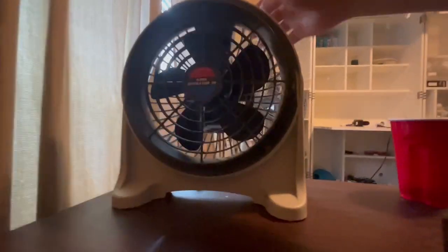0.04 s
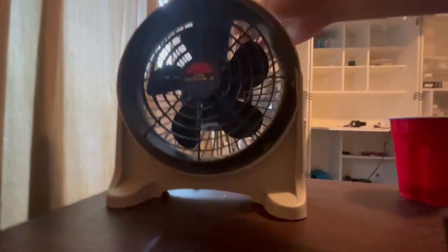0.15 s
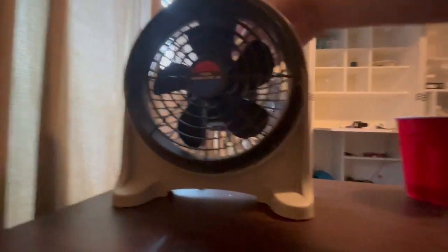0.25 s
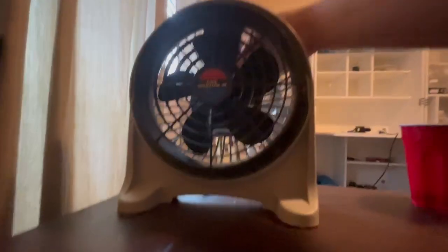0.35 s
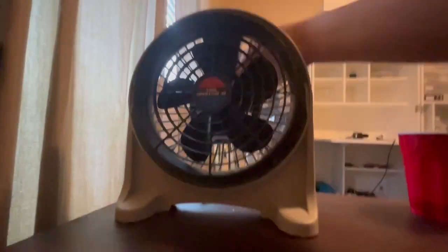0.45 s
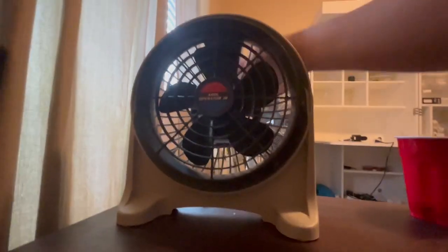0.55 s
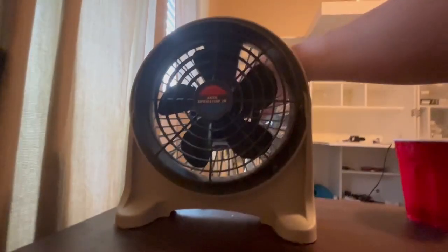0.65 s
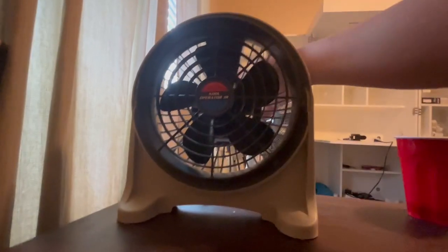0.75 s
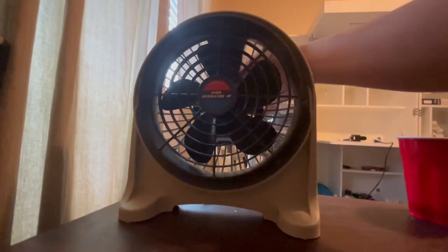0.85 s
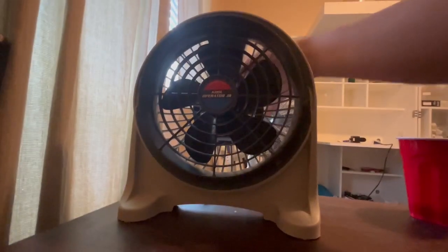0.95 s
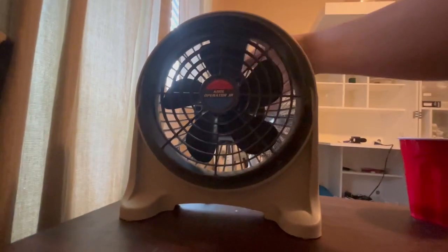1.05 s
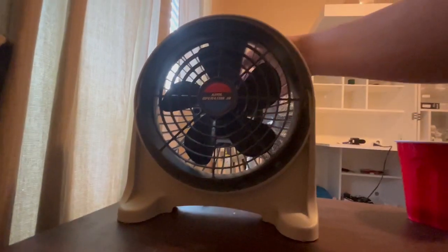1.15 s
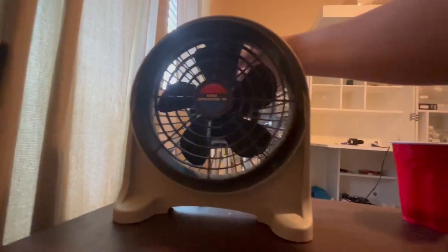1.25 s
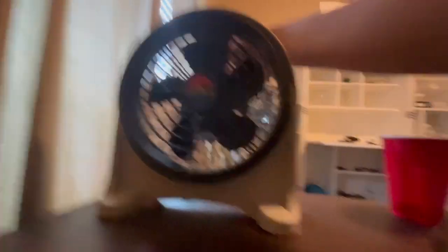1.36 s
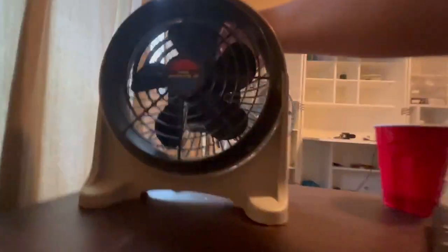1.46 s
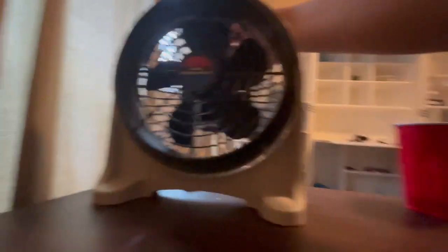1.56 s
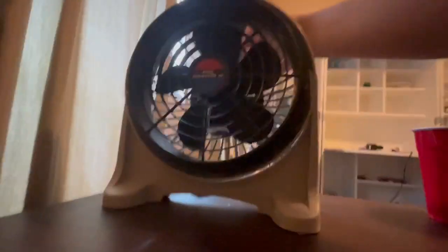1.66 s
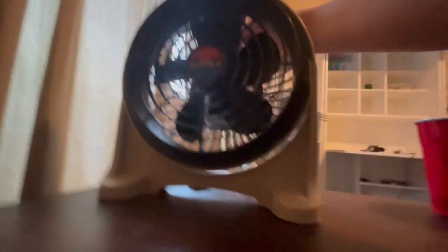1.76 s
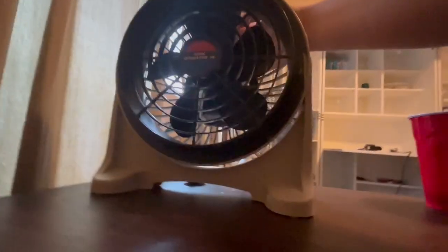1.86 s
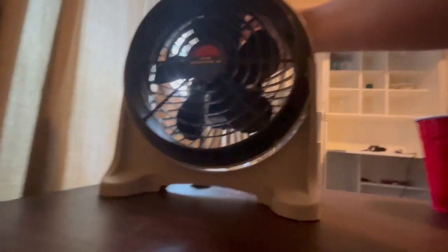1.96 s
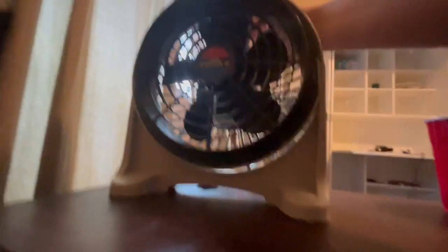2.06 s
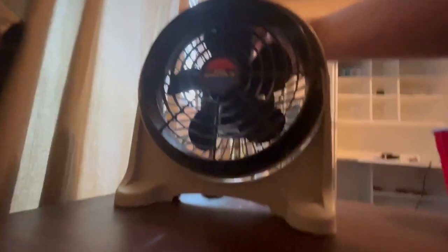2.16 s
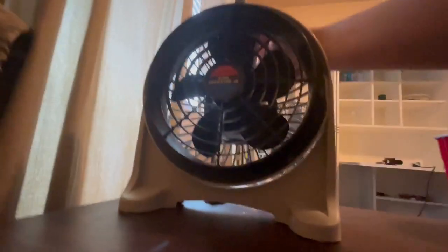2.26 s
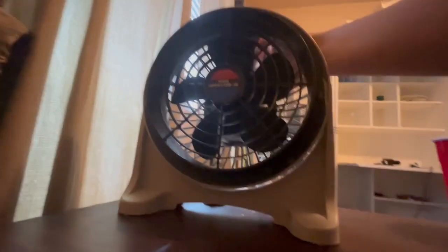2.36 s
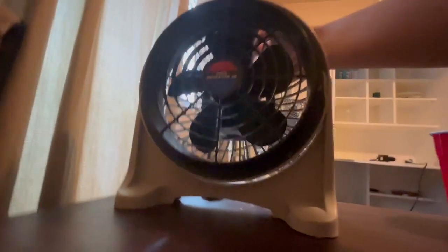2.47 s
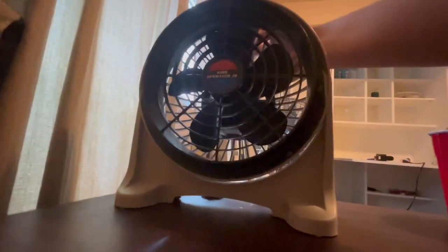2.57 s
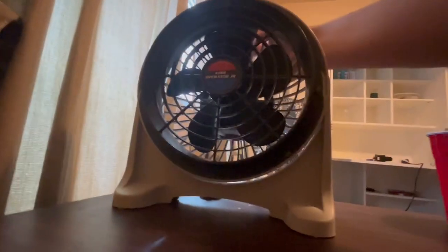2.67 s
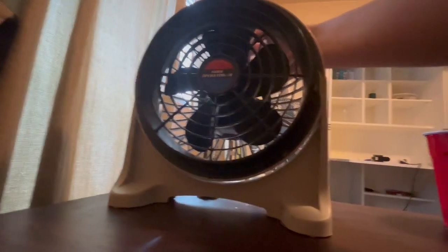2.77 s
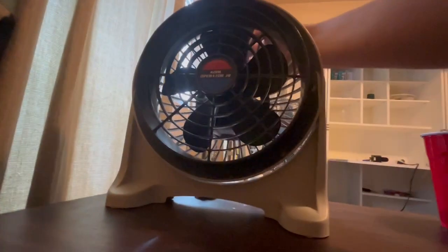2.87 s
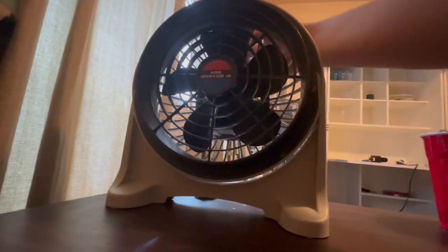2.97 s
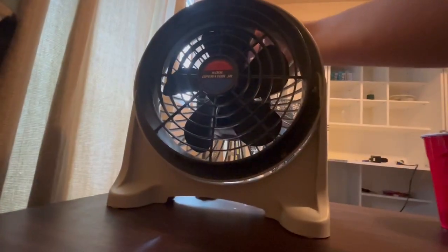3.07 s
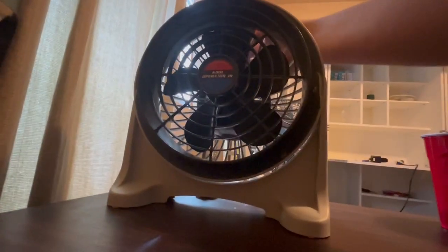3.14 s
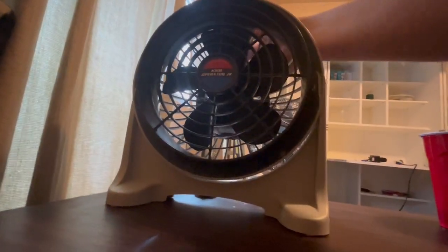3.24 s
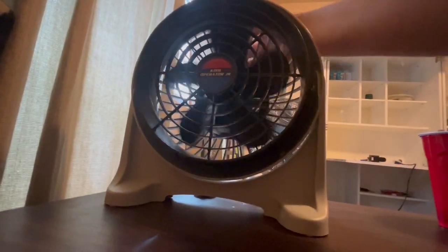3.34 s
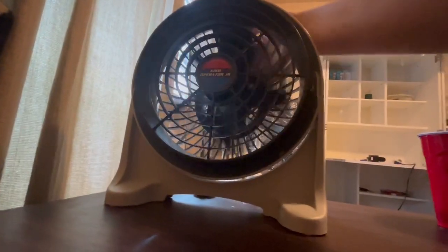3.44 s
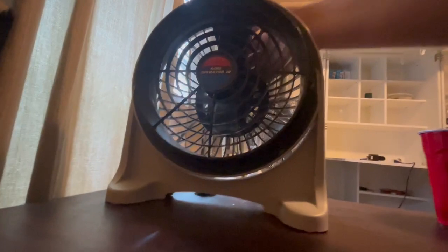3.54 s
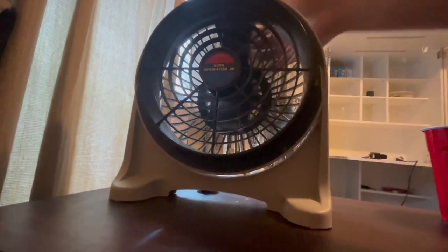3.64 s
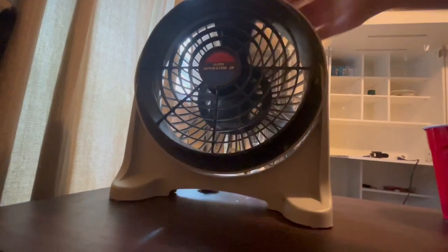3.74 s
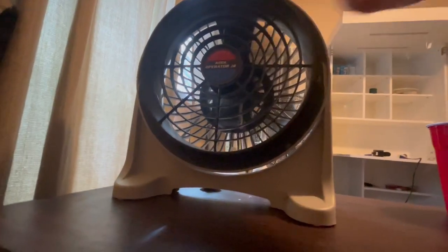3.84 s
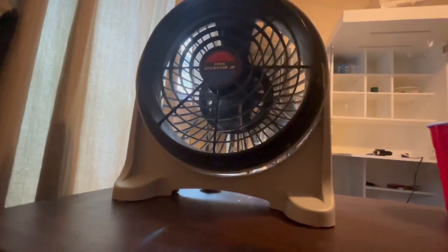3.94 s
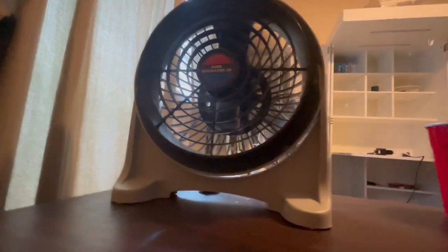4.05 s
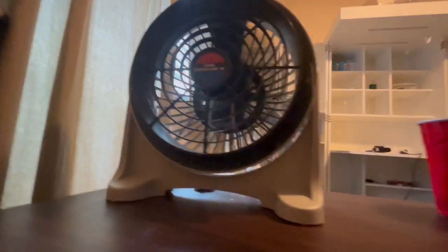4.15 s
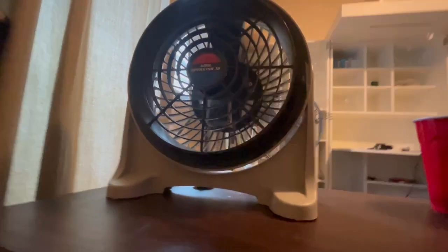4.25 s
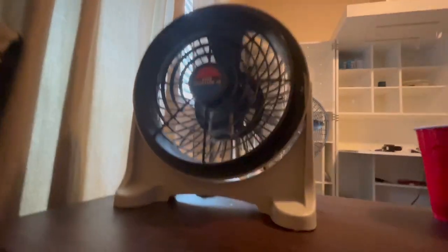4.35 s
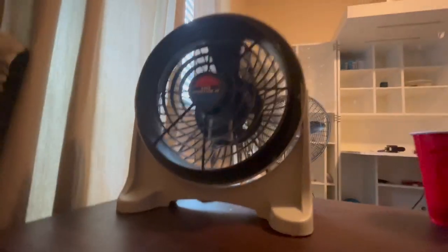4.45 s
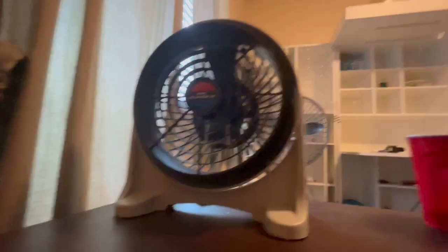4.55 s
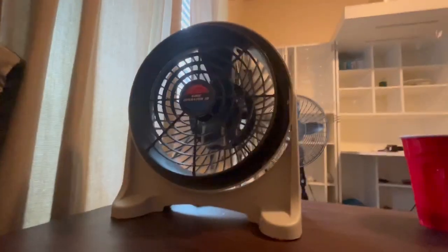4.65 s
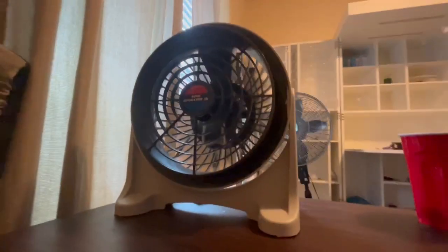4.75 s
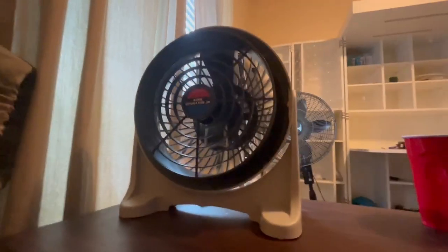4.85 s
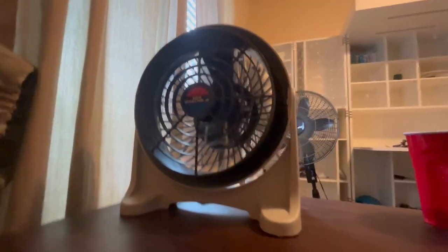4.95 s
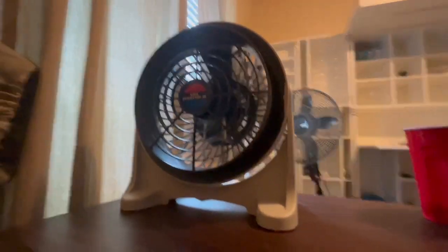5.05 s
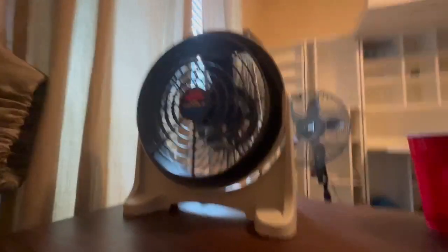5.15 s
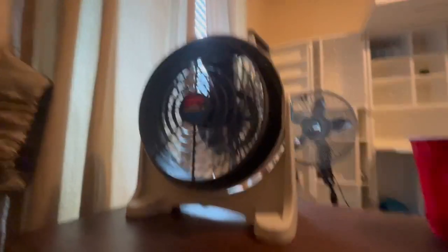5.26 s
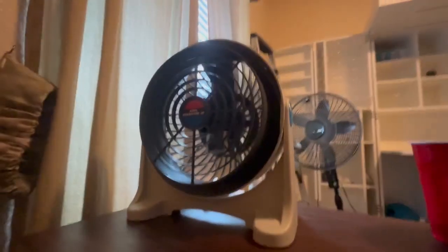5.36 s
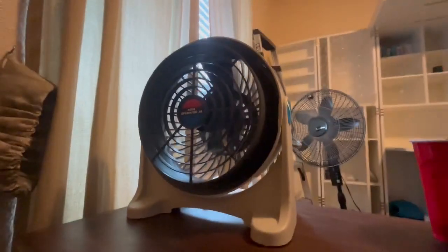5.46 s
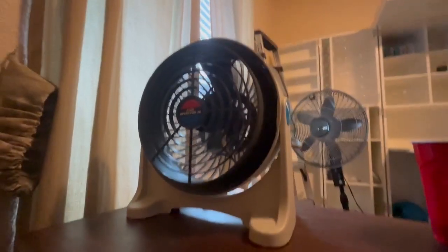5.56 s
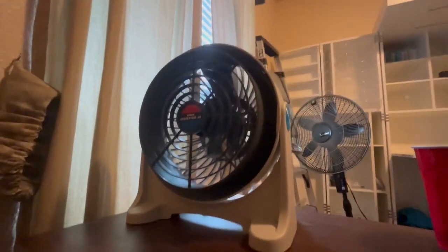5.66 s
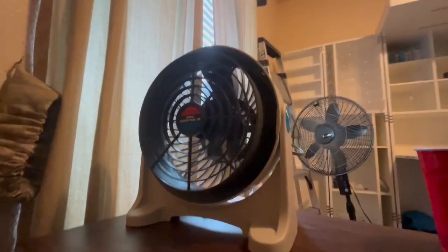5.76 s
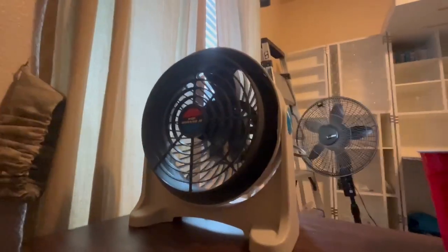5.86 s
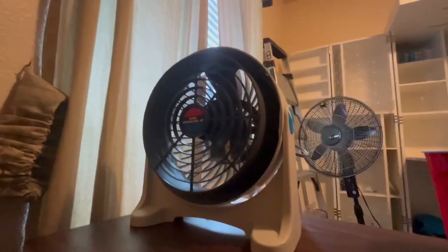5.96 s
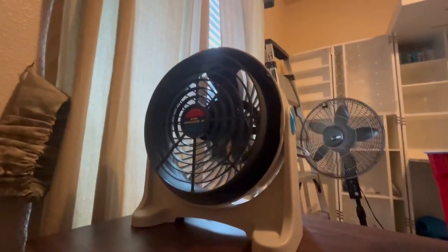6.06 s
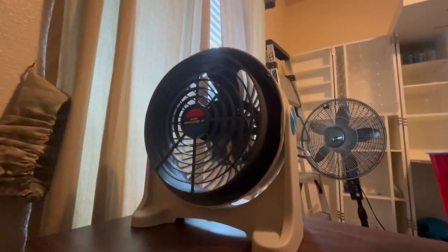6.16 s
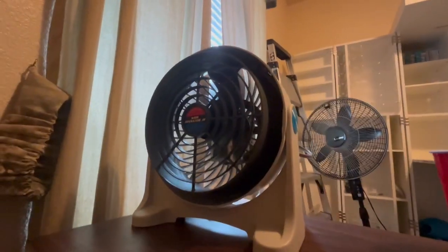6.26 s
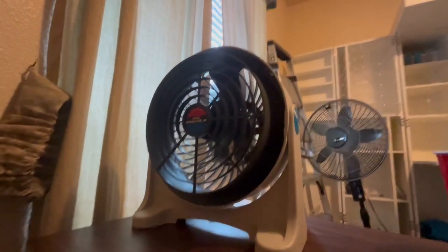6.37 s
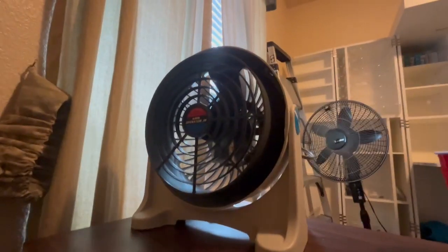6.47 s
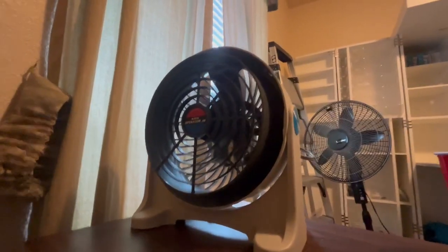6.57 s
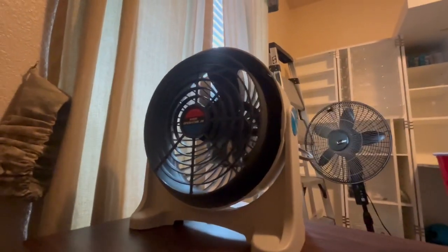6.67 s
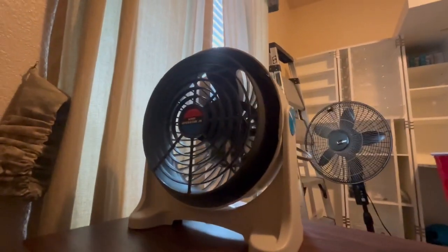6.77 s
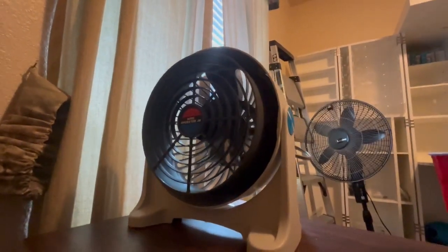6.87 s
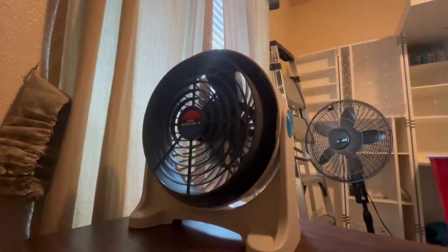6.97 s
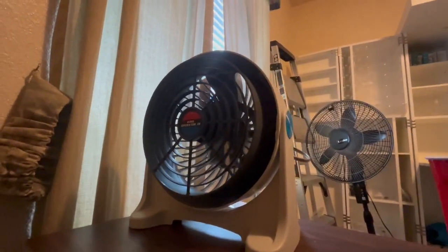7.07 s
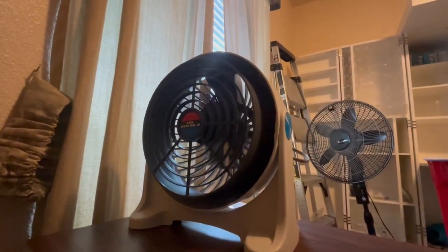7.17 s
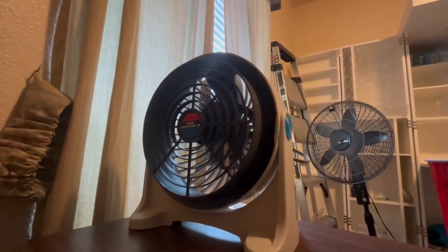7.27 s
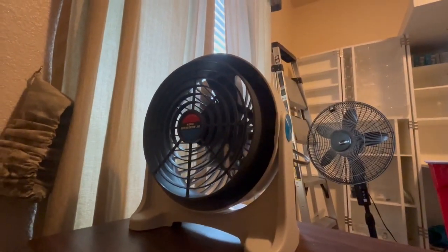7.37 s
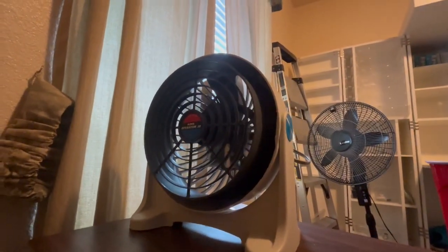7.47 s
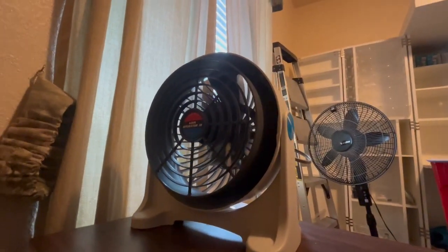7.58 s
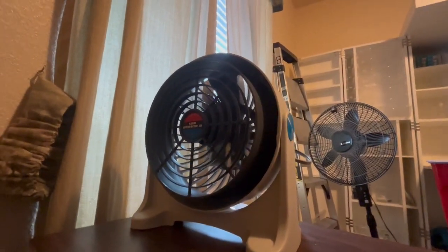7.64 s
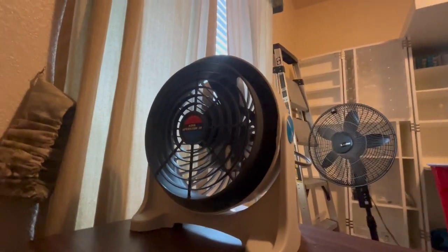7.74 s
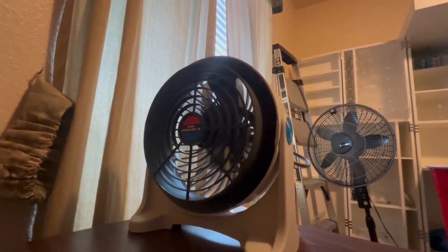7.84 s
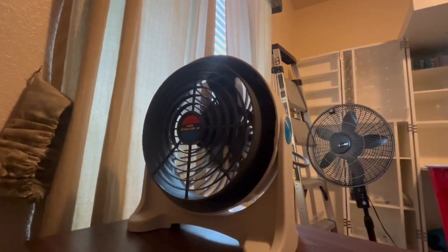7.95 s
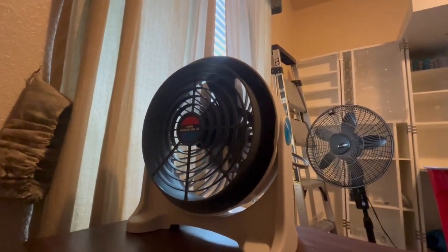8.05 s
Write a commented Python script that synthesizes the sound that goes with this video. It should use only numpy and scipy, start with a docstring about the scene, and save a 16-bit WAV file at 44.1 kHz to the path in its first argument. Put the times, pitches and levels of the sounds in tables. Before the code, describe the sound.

A hand clicks and knocks on a small plastic fan, then it starts up with a steady hum and rush of air.

```python
"""Small desk fan switched on, close up

In a furnished room a hand grips and shifts a plastic fan: skin rubs, the case rattles, the switch
clicks. The motor kicks on with a thump, buzzes, then whines and hums as the rotor spins up. Air rushes
off the blades, hisses through the grille and buffets two hand-held microphones."""
import sys
import numpy as np
from scipy import signal
from scipy.fft import rfft, irfft, next_fast_len
from scipy.io import wavfile
from scipy.ndimage import uniform_filter1d, map_coordinates

SR = 44100
rng = np.random.default_rng(int(sys.argv[2]) if len(sys.argv) > 2 else 0)


def put_to_file(sound):
    """Save the sound as 16-bit audio at rate SR, in the file named by the first command-line argument."""
    columns = np.atleast_2d(sound).T  # one column per channel
    safe = np.clip(columns, -1, 1)
    whole_steps = np.round(safe * 32767)
    wavfile.write(sys.argv[1], SR, whole_steps.astype(np.int16))


N = 357651
TIME = np.arange(N) / SR
TOP_HZ, POWER_ON_S = 14400, 3.285


def amp(db):
    return 10 ** (np.asarray(db) / 20)


def along(points, hz):
    """Table columns interpolated over log frequency."""
    f, *cols = np.transpose(points)
    return np.squeeze([np.interp(np.log(hz + 1), np.log(f + 1), c) for c in cols])


def curve(points):
    return np.interp(TIME, *np.transpose(points))


def gate(start_s, fade_s):
    return np.clip((TIME - start_s) / fade_s, 0, 1)


def wobble(rate_hz):
    """Smooth random curve."""
    return map_coordinates(rng.standard_normal(int(N * rate_hz / SR) + 4), [TIME * rate_hz])


def filtered(x, response):
    n = x.shape[-1]
    m = next_fast_len(n + 8192)
    return irfft(rfft(x, m) * response(np.fft.rfftfreq(m, 1 / SR)), m)[..., :n]


def panned(db):
    """Left and right gains, mean 1."""
    left = 2 / (1 + amp(-db))
    return np.array([[left], [2 - left]])


# Stereo image, wide in the middle, mono in the top treble:
# (frequency [Hz], coherence [0-1], left lead [rad], left over right [dB])
STEREO_IMAGE = [(60.4, 0.55, 0.8, 2.5), (139, 0.77, 0.4, 5), (460, 0.84, 1, 8), (840, 0.39, 0.5, 7),
                (1170, 0.88, 1, 1.5), (1700, 0.39, 3.5, 4.5), (1993, 0.72, 4, 0.5), (2545, 0.45, 8, 2.5),
                (3820, 0.26, 9, 5), (5100, 0, 5, 8.5), (6850, 0.43, 5, 7.5), (7350, 0.1, 5, 1),
                (8620, 0.7, 0.8, 4), (9950, 0.57, 1.5, -1.5), (11600, 1, -2.5, -1), (14700, 1, -1, 0.5)]
def noise(spectrum, patchy_db):
    """Patchy coloured stereo noise; the channel mean has rms 1."""
    cells = signal.stft(rng.standard_normal((3, N)), nperseg=512)[2]
    patches = uniform_filter1d(rng.standard_normal(cells.shape[1:]), size=6, axis=0)
    patches = uniform_filter1d(patches, size=12, axis=1)
    patches /= np.sqrt(np.mean(patches ** 2))
    common, *own = signal.istft(cells * amp(patchy_db * patches), nperseg=512)[1][:, :N]

    def heard(hz, shared):
        coherence, lead_rad, pan_db = along(STEREO_IMAGE, hz)
        coherence = np.clip(coherence, 0, 1)
        side = np.array([[.5], [-.5]])
        share = np.sqrt(coherence) * np.exp(1j * side * lead_rad) if shared else np.sqrt(1 - coherence)
        return share * amp(along(spectrum, hz) + side * pan_db)
    pair = filtered(common, lambda hz: heard(hz, True))
    pair += filtered(np.array(own), lambda hz: heard(hz, False))
    return pair / np.std(pair.mean(axis=0))


def knocks(events, modes, snap, blow_t60_s, pan_db, thud_db, room_db, room_t60_s, soft=0):
    """A snap and a burst ring the modes, with crack, desk thud and echo; soft dulls low-treble blows."""
    def body(f, damp=1):
        ring = sum((-1) ** k * amp(db) * 1j * f * width / (hz * hz - f * f + 1j * f * width * damp)
                   for k, (hz, width, db) in enumerate(modes))
        return ring / (1 + 1j * f / 6500) ** 2

    def bright(f):
        return (1j * f / (2500 + 1j * f)) ** 2 / (1 + 1j * f / 6000) ** 3

    def unit_peak(x):
        return x / np.max(np.abs(x))

    out, t = np.zeros((2, N + SR)), np.arange(SR // 4) / SR
    for s, db, treble_db in events:
        white = rng.standard_normal((3, len(t)))
        detune, thud_hz = amp(0.21 * white[2, 0]), 200 * amp(white[1, 0])
        blow = white[0] * amp(-60 * t / blow_t60_s) * (1 - np.exp(-t / 0.00067))
        hit = blow + snap * np.exp(-((t - 0.001) / 0.00005) ** 2)
        echo = white[1:] * amp(room_db - 60 * t / room_t60_s) * (1 - np.exp(-t / 0.00036))
        ring = filtered(hit * panned(pan_db), lambda f: body(f * detune))
        ring += filtered(echo, lambda f: 2 * body(f, damp=1.8) / (1 + 1j * f / 1500))  # walls blur, dull
        cutoff_hz = TOP_HZ * amp(soft * treble_db)
        ring = filtered(ring, lambda f: 1 / (1 + 1j * f / cutoff_hz) ** 2)
        crack = filtered(blow * panned(pan_db + 3) + echo, bright)  # left port faces the treble
        thud = np.sin(2 * np.pi * thud_hz * t) * amp(-60 * t / 0.22)
        thud *= 1 - np.exp(-(t / 0.0091) ** 2)  # desk answers late
        knock = unit_peak(ring) + amp(treble_db) * unit_peak(crack) + amp(thud_db) * unit_peak(thud)
        out[:, round(s * SR):][:, :len(t)] += amp(db) * knock
    return out[:, :N]


# Room noise spectra: (frequency [Hz], relative density [dB])
ROOM_RUMBLE_SPECTRUM = [(15, -39), (25, -3.5), (49, -3), (124, -9), (145, -13.5), (203, -19), (500, -40.5),
                        (650, -51), (1100, -120)]
ROOM_HISS_SPECTRUM = [(180, -29), (300, -2.5), (2830, -10), (4090, -14), (12500, -22.5), (14200, -27)]
def room():
    """Low rumble and faint even hiss."""
    rumble = amp(-64.5 + 3.8 * wobble(24)) * noise(ROOM_RUMBLE_SPECTRUM, patchy_db=2)
    return rumble + amp(-79.5) * noise(ROOM_HISS_SPECTRUM, patchy_db=1)


# Noise swells: (peak time [s], length [s], rub [dB], thump [dB], hiss [dB])
SWELLS = [(0.034, 0.54, -59, -51, -71.5), (0.308, 0.065, -69, -63, -70), (0.51, 0.044, -67, -85, -86),
          (0.658, 0.095, -68, -71, -74.5), (0.847, 0.11, -68.5, -82, -71.5), (1.276, 0.23, -63, -67, -71.5),
          (1.427, 0.46, -69.5, -62, -77), (1.568, 0.27, -60.5, -45.5, -71), (1.892, 0.14, -69, -77, -76),
          (2.18, 0.14, -64, -70, -79), (0.6, 1, -87, -85, -83.5), (2.704, 0.073, -69, -76, -74),
          (3.312, 0.17, -81, -50, -94), (3.375, 0.15, -65.5, -62, -79)]
# Swell spectra: (frequency [Hz], relative density [dB])
RUB_SPECTRUM = [(300, -12.5), (780, -2.5), (1550, -1), (1880, 6), (2200, -9), (3200, -24), (5000, -120)]
THUMP_SPECTRUM = [(25, -22), (50, 3.5), (100, 4), (160, -6.5), (260, -11.5), (500, -30), (1100, -120)]
HIGH_HISS_SPECTRUM = [(1500, -60), (3200, -0.5), (3850, 2), (5500, -5.5), (7500, -12.5), (9700, -6),
                      (14200, -21)]
def rubs_and_thumps():
    """A hand rubs and grips; faint background hiss in the first second; the motor's kick at 3.312 s."""
    rub_gain, thump_gain, hiss_gain = sum(
        np.outer(amp(levels_db), np.cos(np.pi * np.clip((TIME - s) / length_s, -.5, .5)) ** 2)
        for s, length_s, *levels_db in SWELLS)
    thump = thump_gain * amp(2.5 * wobble(24.7)) * noise(THUMP_SPECTRUM, patchy_db=2.5)
    flicker = amp(wobble(90))
    rub = rub_gain * noise(RUB_SPECTRUM, patchy_db=5)
    hiss = hiss_gain * noise(HIGH_HISS_SPECTRUM, patchy_db=2.5)
    return thump + flicker * (rub + hiss)


# Knocks and a switch click: (time [s], level [dB], relative treble [dB])
PLASTIC_HITS = [(0.015, -37, -10), (0.039, -38, -32), (0.085, -42, -31), (0.099, -36, -24),
                (0.124, -36, -17), (0.157, -36.5, -18), (0.19, -41.5, -22), (0.32, -31.5, -8.5),
                (0.4, -33, -10.5), (1.233, -41, -38), (1.522, -32.5, -9), (1.546, -32.5, -12),
                (1.597, -28.5, -7), (1.662, -28.5, -9), (1.944, -47, -34), (3.467, -26, -10),
                (3.501, -32, -13.5), (3.648, -31, -10)]
# Case resonances: (frequency [Hz], width [Hz], gain [dB])
CASE_MODES = [(227, 49, 0.5), (603, 55, -5), (788, 19, -0.5), (1228, 95, -2.5), (1858, 87, -3.5),
              (2514, 135, -13), (3274, 74, -10), (3770, 61, -21)]
def plastic_knocks():
    """Plastic knocks, and a sharp switch click at 3.467 s as the fan starts."""
    return knocks(PLASTIC_HITS, CASE_MODES, snap=4, blow_t60_s=0.047, pan_db=11,
                  thud_db=-19, room_db=-3, room_t60_s=0.17, soft=0.66)


# Tick: (time [s], level [dB], relative treble [dB])
TICK_HITS = [(0.231, -39.5, -16)]
# Tick resonances: (frequency [Hz], width [Hz], gain [dB])
TICK_MODES = [(1860, 120, -6), (5480, 150, 9), (7300, 660, 4)]
def tick():
    """One thin, bright tick."""
    return knocks(TICK_HITS, TICK_MODES, snap=6, blow_t60_s=0.01, pan_db=16,
                  thud_db=-60, room_db=-13, room_t60_s=0.22)


# Clicks: (time [s], level [dB], relative treble [dB])
SWITCH_HITS = [(1.342, -35.5, -45), (1.779, -44.5, -45), (1.876, -44.5, -3), (2.507, -26, -45),
               (2.787, -46.5, -13), (2.936, -41, -18.5), (2.996, -50, -26), (3.113, -37.5, -14),
               (3.139, -14, -10.5), (3.272, -57, 12), (3.666, -28.5, -12)]
# Switch resonances: (frequency [Hz], width [Hz], gain [dB])
SWITCH_MODES = [(710, 130, -10), (1290, 150, 1), (1920, 155, 5), (2600, 110, -5.5), (2990, 110, -7),
                (3440, 62, -8), (4020, 200, -7)]
def switch_clicks():
    """Switch and grille click under short, hard blows."""
    return knocks(SWITCH_HITS, SWITCH_MODES, snap=3.4, blow_t60_s=0.013, pan_db=10.5,
                  thud_db=-41.5, room_db=-16, room_t60_s=0.26)


# Taps: (time [s], level [dB])
TAP_HITS = [(2.448, -50.5), (2.529, -51), (2.611, -48.5), (2.698, -47), (2.787, -45), (2.868, -46.5),
            (2.956, -47.5), (3.04, -52), (3.212, -37), (3.283, -45.5), (3.389, -36.5)]
# Hollow resonances: (frequency [Hz], width [Hz], gain [dB])
TAP_MODES = [(312, 40, 2.5), (700, 45, 2), (1137, 130, -8.5)]
def tapping(treble_db=-32):
    """Soft, even, hollow taps."""
    hits = [(s, db, treble_db) for s, db in TAP_HITS]
    return knocks(hits, TAP_MODES, snap=3.8, blow_t60_s=0.031, pan_db=-8,
                  thud_db=-24, room_db=-11.5, room_t60_s=0.27)


def rotor_speed(half_speed_s=3.909, spin_up_s=0.295):
    """S-shaped run-up, as a share of full speed."""
    return 1 / (1 + np.exp((half_speed_s - TIME) / spin_up_s))


def tone(cycles, rms_db, blur_rad, pan_db, lead_rad):
    """Stereo sine with wandering phase."""
    phase = 2 * np.pi * cycles + blur_rad * wobble(12)
    pair = np.sin([phase + lead_rad / 2, phase - lead_rad / 2])
    return np.sqrt(2) * amp(rms_db) * panned(pan_db) * pair


# Hum throb: (time [s], level [dB])
HUM_LEVELS = [(3.55, -67), (3.94, -29), (4.1, -48), (4.43, -25.5), (4.55, -46), (5.03, -49), (5.15, -33),
              (5.64, -37), (5.78, -27.5), (5.95, -36), (6.25, -41.5), (6.45, -32), (6.63, -37.5),
              (6.8, -30.5), (7.24, -36.5), (7.6, -25.5), (7.8, -37), (7.97, -27), (8.11, -31)]
# Blade tones: (multiple of rotor rate, level at full speed [dB])
BLADE_ORDERS = [(4, -48.5), (8, -48.5)]
# Mains harmonics in the winding: (frequency [Hz], relative level [dB])
BUZZ_PARTIALS = [(240, 0), (1200, -19), (1320, -18), (1680, -16), (1800, -18)]
def motor(speed, full_hz=46.2, whine_peak_s=3.64, whine_width_s=0.21):
    """Winding buzz gives way to rotor tones; turbulent inflow blurs them and makes the hum throb."""
    turns = np.cumsum(full_hz * speed) / SR
    speed_db = 20 * np.log10(speed)
    hum = tone(2.97 * turns, curve(HUM_LEVELS) + 2 * wobble(25), blur_rad=0.8, pan_db=7, lead_rad=0.37)
    blades = sum(tone(order * turns, db + 11 * speed_db + 3 * wobble(5.9),
                      blur_rad=0.37, pan_db=17, lead_rad=0.22) for order, db in BLADE_ORDERS)
    whine_db = -53.5 - 10 * ((TIME - whine_peak_s) / whine_width_s) ** 2  # motor pulling up
    whine = tone(14 * turns, whine_db, blur_rad=0.56, pan_db=0, lead_rad=0.28)
    buzz_db = -54 - 38 * speed
    buzz = sum(tone(hz * TIME, buzz_db + db, blur_rad=1.7, pan_db=-2, lead_rad=0.3)
               for hz, db in BUZZ_PARTIALS)
    return gate(POWER_ON_S, fade_s=0.035) * (hum + blades + whine + buzz)


# Stream between eddies: (time [s], level [dB])
STREAM_LEVELS = [(3.6, -53.5), (3.85, -40.5), (4.1, -41), (4.3, -34), (4.95, -39), (5.1, -49), (6.0, -50),
                 (6.9, -40), (7.3, -51), (8.11, -41)]
# Eddies: (time [s], level [dB], nominal frequency [Hz])
EDDIES = [(3.949, -16, 102), (4.024, -10.5, 145.2), (4.074, -19.5, 156), (4.091, -18.5, 72),
          (4.138, -18, 188), (4.163, -22, 119), (4.254, -28, 114), (4.459, -14.5, 116), (4.487, -10.5, 180),
          (4.51, -9, 218), (4.544, -13, 200), (4.645, -23, 150), (4.679, -17.5, 253), (4.765, -20.5, 230),
          (4.779, -24, 243), (4.853, -25.5, 83.6), (4.889, -23, 248), (4.909, -26, 80),
          (5.182, -19.5, 70.5), (5.384, -21, 201), (5.427, -22.5, 80.6), (6.065, -18.5, 174),
          (7.098, -21, 75)]
# Wind spectra: (frequency [Hz], relative density [dB])
BUFFET_SPECTRUM = [(12, -50), (20, -16), (65, -1), (130, -7), (210, -22), (350, -120)]
FLUTTER_SPECTRUM = [(65, -39), (110, -10), (200, -6), (285, -8.5), (338, -8.5), (534, -45), (1540, -120)]
def wind(puff_lag_s=0.0056, puff_width_s=0.017, flutter_threshold_db=-43):
    """Air tumbles over the microphones; strong eddies slap for a cycle or two and drag a puff behind."""
    slaps, puffs, t = np.zeros((2, N + SR)), np.zeros(N), np.arange(SR // 10) / SR
    for s, db, hz in EDDIES:
        age = t * hz / 0.64
        eddy = (age * np.exp(1 - age)) ** 3 * np.sin(2 * np.pi * hz * t * (1.2 - 0.067 * age))
        slaps[:, round(s * SR):][:, :len(t)] -= amp(db) * panned(17) * eddy
        puff_db = db - 15.5 - 1.5 * np.log2(hz / 100)  # big slow eddies push more air
        puffs = np.maximum(puffs, amp(puff_db) * np.exp(-((TIME - s - puff_lag_s) / puff_width_s) ** 2))
    gust = gate(POWER_ON_S, fade_s=0.42) * amp(curve(STREAM_LEVELS)) + puffs
    buffet = gust * amp(1.25 * wobble(20)) * noise(BUFFET_SPECTRUM, patchy_db=3)
    excess = np.maximum(gust - amp(flutter_threshold_db), 0)
    flutter = excess * amp(1 + 0.7 * wobble(50)) * noise(FLUTTER_SPECTRUM, patchy_db=4)
    return panned(4.3) * (buffet + flutter) + slaps[:, :N]


# Airflow spectra: (frequency [Hz], relative density [dB])
BLADE_SPECTRUM = [(60, -60), (100, -10.5), (160, -6), (250, -12.5), (405, -13.5), (700, -12.5),
                  (790, -17.5), (890, -19.5), (942, -15), (1200, -14), (1380, -22.5), (2000, -19.5),
                  (2600, -68)]
GRILLE_SPECTRUM = [(760, -30), (1300, -6.5), (1410, -34), (1980, -2.5), (2190, -4.5), (2480, 1), (2700, -6),
                   (3010, -3.5), (5940, -13), (7780, -16.5), (12000, -23), (13200, -24.5), (14300, -32)]
def airflow(speed, band_hz=2470, band_width_hz=120, band_opens_s=4.71):
    """Blade rush and grille hiss grow steeply with speed, the top of the hiss most."""
    speed_db = 20 * np.log10(speed)
    swell_db = 0.3 * wobble(3)
    rush = amp(-32 + 2.65 * speed_db + swell_db) * noise(BLADE_SPECTRUM, patchy_db=1)
    hiss = noise(GRILLE_SPECTRUM, patchy_db=0.98)
    # One band opens as the microphones move round the fan.
    band = filtered(hiss, lambda hz: np.exp(-((hz - band_hz) / band_width_hz) ** 2))
    hiss -= 0.41 * (1 - gate(band_opens_s, fade_s=0.06)) * band
    top = filtered(hiss, lambda hz: 1 / (1 + (5000 / (hz + 1)) ** 4))
    return rush + amp(-41.5 + 3.75 * speed_db + swell_db) * (hiss - top + amp(2 * speed_db) * top)


def scene():
    speed = rotor_speed()
    return (room() + rubs_and_thumps() + plastic_knocks() + tick() + switch_clicks() + tapping()
            + motor(speed) + wind() + airflow(speed))


def record(dry):
    """The microphones lose the deepest bass; nothing passes above TOP_HZ."""
    return filtered(dry, lambda hz: (1j * hz / (25 + 1j * hz)) ** 2 * (hz < TOP_HZ))


dry = scene()
out = record(dry)
put_to_file(out)
```